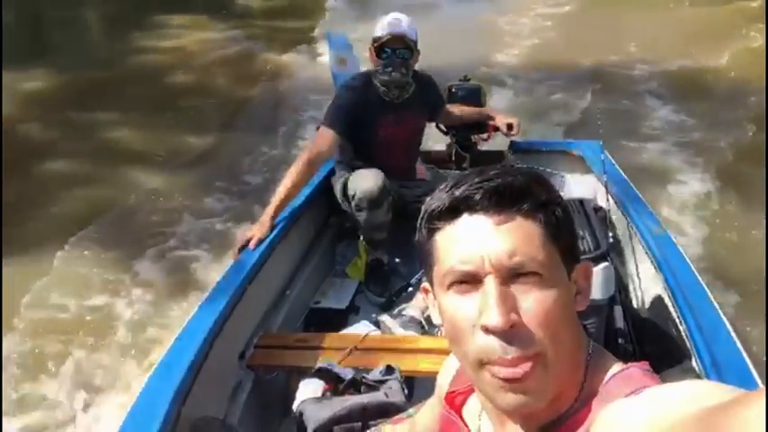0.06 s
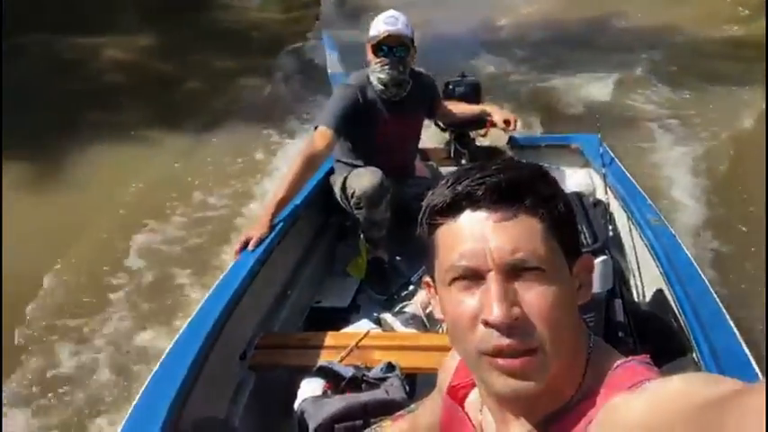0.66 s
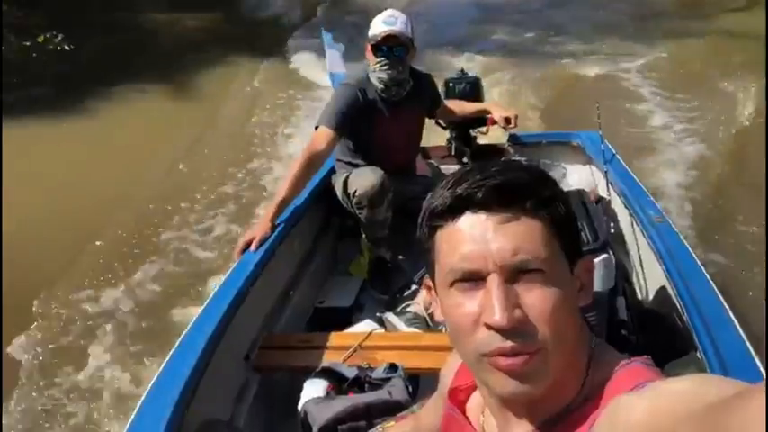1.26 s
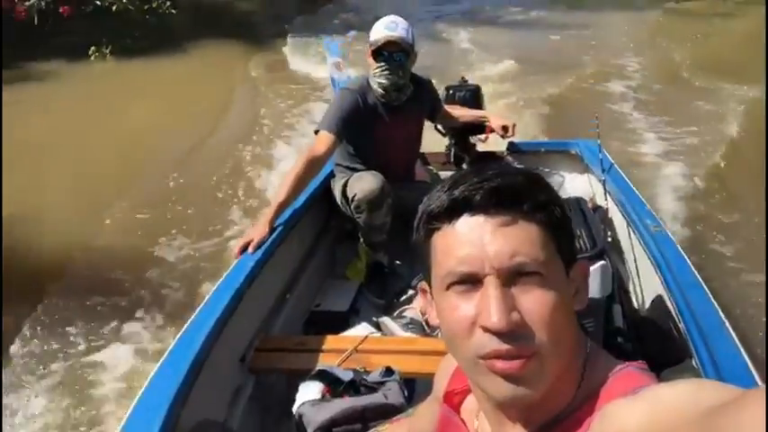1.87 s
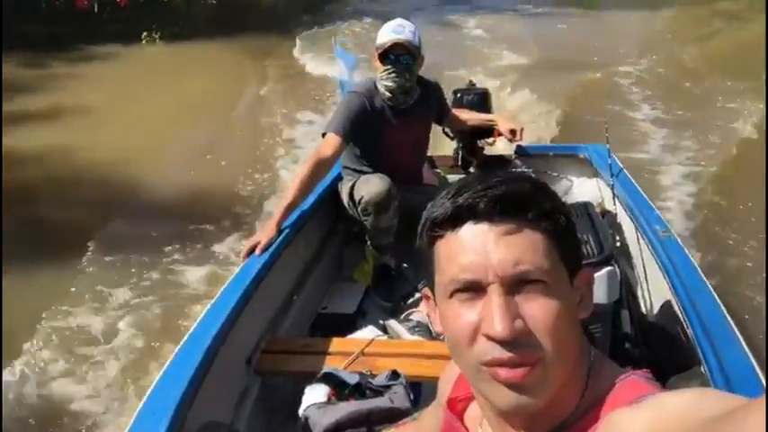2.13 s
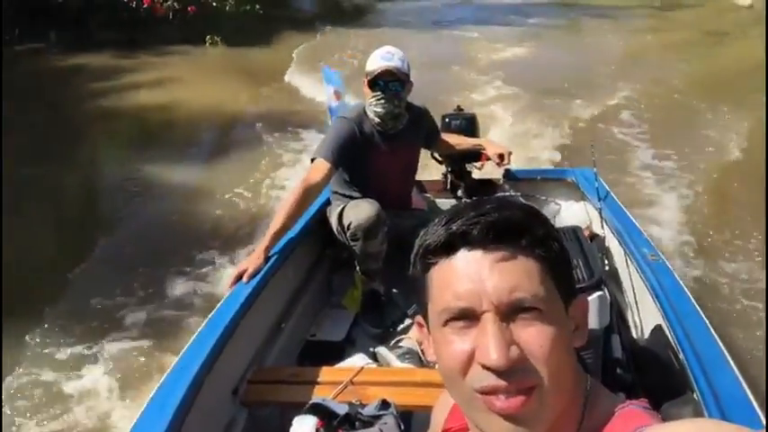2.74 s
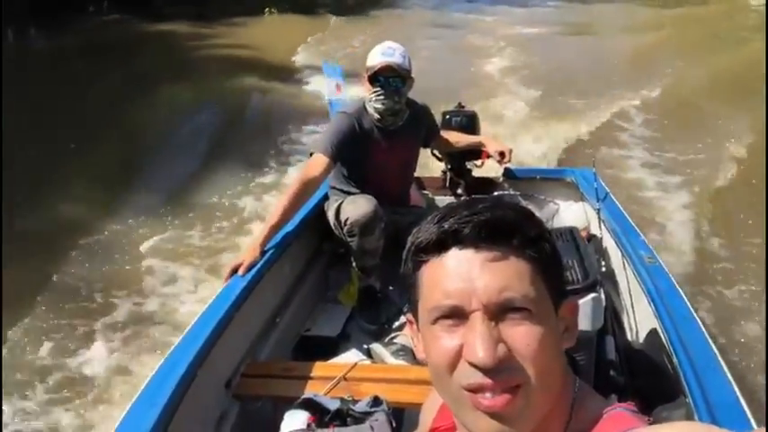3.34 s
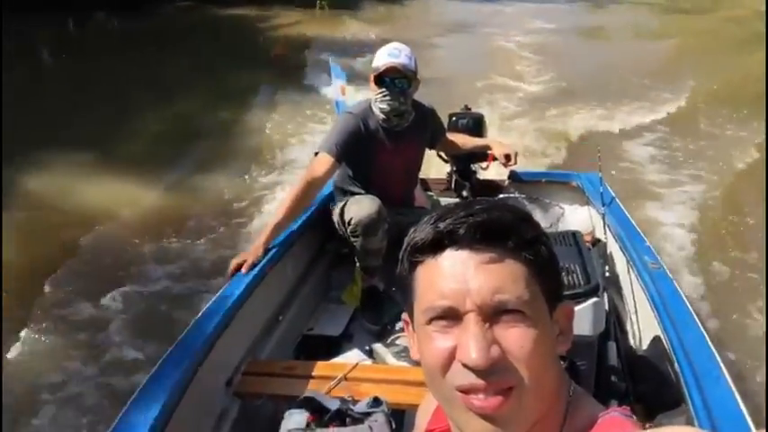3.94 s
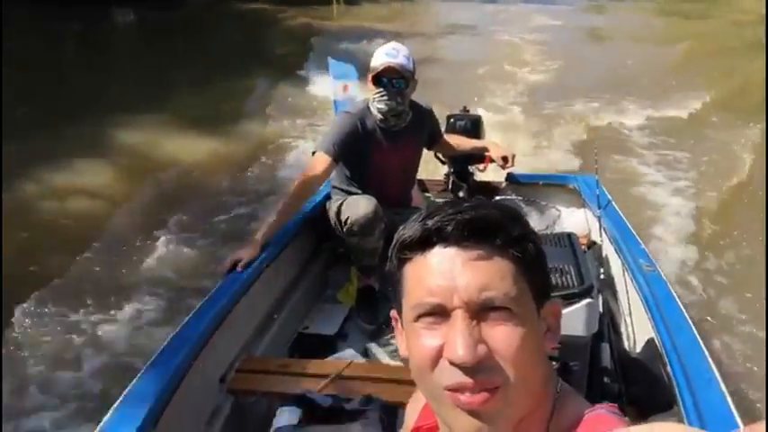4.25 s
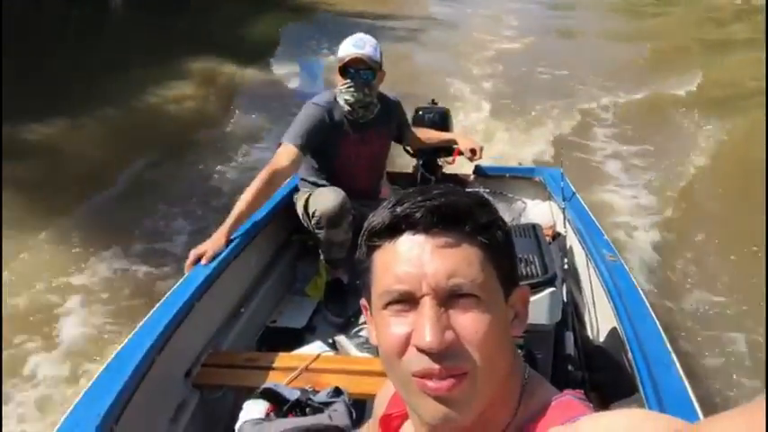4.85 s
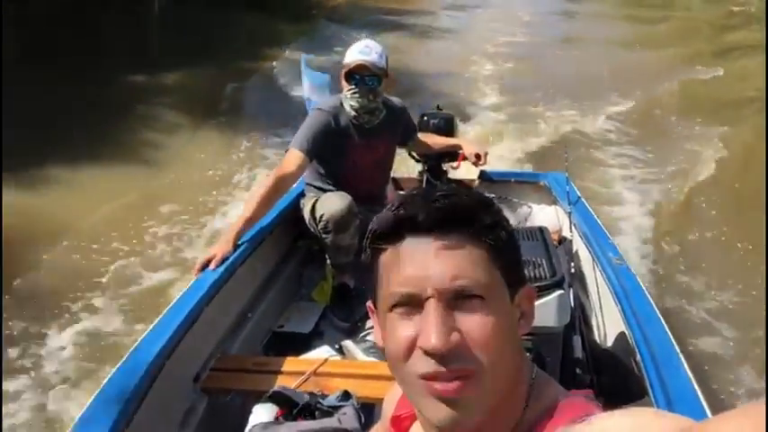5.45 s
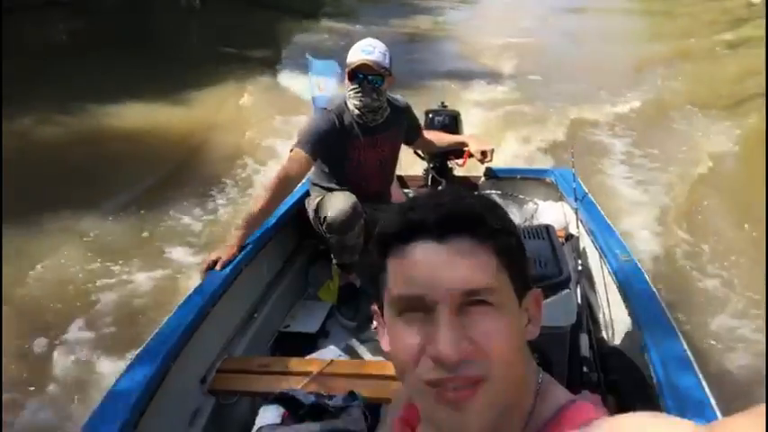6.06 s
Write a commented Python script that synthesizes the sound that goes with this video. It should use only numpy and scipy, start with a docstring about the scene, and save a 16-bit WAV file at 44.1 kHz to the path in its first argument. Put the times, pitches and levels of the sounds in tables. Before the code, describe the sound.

A small outboard motor pushes an open boat along a river at a steady cruise, heard from the bow. The exhaust drones and gurgles under water, the hull hums and the engine rattles, growing slightly louder over the first seconds. Water washes along the sides with bubbles and spray throughout. A few faint drops plink beside the hull, and later slightly larger waves splash against the bow.

```python
"""A small two-stroke outboard pushes an open boat up a river at a steady cruise, heard from the bow.
From the start each turn of the crank fires once: the exhaust drones and gurgles under water, the hull
hums, the powerhead rattles, and the bow wave washes along the sides with bubbles and spray.
Over the first seconds the motor grows slightly louder and settles. From about one second single drops
plink beside the hull, and from about two and a half larger waves splash against the bow."""
import sys
import numpy as np
from scipy import signal
from scipy.fft import rfft, irfft, next_fast_len
from scipy.io import wavfile
from scipy.ndimage import uniform_filter1d, map_coordinates

SR = 44100
rng = np.random.default_rng(int(sys.argv[2]) if len(sys.argv) > 2 else 0)


def pcm_store(signal):
    """Save signal as 16-bit PCM."""
    levels = np.round(np.clip(np.atleast_2d(signal), -1, 1) * 32767)
    wavfile.write(sys.argv[1], SR, levels.astype(np.int16).T)


N = 273494

# The throttle is held, and the crank slows a little as the motor takes more load.
# Each row: time in seconds, crank speed in turns a second.
CRANK_SPEED = [(0, 72.93), (3.6, 73.1), (4.601, 72.83), (6.2, 72.66)]


def amp(db):
    """Decibels to gain."""
    return 10 ** (np.asarray(db) / 20)


def unit(x):
    """Scale to rms 1."""
    return x / np.sqrt(np.mean(x ** 2) + 1e-20)


def along(points, hz):
    """Read a curve of (Hz, value) points on a log frequency axis."""
    point_hz, values = np.transpose(points)
    return np.interp(np.log(hz + 1), np.log(point_hz + 1), values)


def automation(points):
    """Join (seconds, value) points with straight lines, one value per sample."""
    times, values = np.transpose(points)
    return np.interp(np.arange(N) / SR, times, values)


def wobble(rate):
    """A smooth random curve with `rate` knots a second."""
    knots = rng.standard_normal(int(N * rate / SR) + 4)
    return map_coordinates(knots, [np.arange(N) * rate / SR])


def filtered(x, response):
    """Filter x with a gain given as a function of frequency."""
    size = next_fast_len(N + SR // 2)
    hz = np.fft.rfftfreq(size, 1 / SR)
    return irfft(rfft(x, size) * response(hz), size)[:N]


def coloured(x, spectrum):
    """Shape x with an EQ curve of (Hz, dB) points; rms 1."""
    return unit(filtered(x, lambda hz: amp(along(spectrum, hz))))


def patchy_noise(depth_db):
    """White noise with patches of random gain drifting over time and frequency."""
    spectra = signal.stft(rng.standard_normal(N), nperseg=512)[2]
    patches = uniform_filter1d(rng.standard_normal(spectra.shape), size=8, axis=0)
    patches = uniform_filter1d(patches, size=10, axis=1)
    return signal.istft(spectra * amp(depth_db * unit(patches)), nperseg=512)[1][:N]


def grains(pitch_hz, spread, cycles, scatter_db, rise, count, samples):
    """A cloud of damped, rising sines at random moments, some louder than the rest; rms 1."""
    when, pick, strength = rng.random((count, 3)).T[:, :, None]
    hz = pitch_hz * np.exp(spread * (2 * pick - 1))
    age = hz * np.arange(samples) / SR / cycles  # in decay times, each `cycles` periods long
    gain = amp(-scatter_db * np.log(1 - 0.97 * strength))
    envelope = (1 - np.exp(-4 * age)) * np.exp(-age)
    glide = 1 + rise * np.minimum(age, 2)
    rings = gain * envelope * np.sin(2 * np.pi * cycles * age * glide)
    positions = (when * N).astype(int) + np.arange(samples)
    return unit(np.bincount(positions.ravel(), rings.ravel(), N)[:N])


def crank(hunt_hz=0.05, tremble_hz=0.08):
    """Crank angle in turns; the speed hunts slowly, and uneven combustion makes it tremble."""
    speed_hz = automation(CRANK_SPEED) + hunt_hz * wobble(3) + tremble_hz * wobble(24)
    return np.cumsum(speed_hz) / SR


def effort_db(shortfall_db=1.9, settle_s=2.45):
    """The motor starts just under its cruising level and eases up to it as it works harder."""
    return -shortfall_db * np.exp(-np.arange(N) / SR / settle_s)


def exhaust(turns, settled_tone_db=-16.0):
    """Each firing sends a lopsided pressure wave and a puff of bubbles."""
    # The octave above the firing tone swells and sinks. Each row: time in seconds, level in dB.
    octave_levels = [(0, -36), (0.13, -20), (0.35, -25.5), (1.55, -24.5), (1.73, -28.5), (2.15, -22),
                     (2.7, -27.5), (2.81, -36), (2.96, -23), (3.9, -24), (4.14, -21), (4.33, -27),
                     (4.7, -20.5), (5.17, -28.5), (5.28, -20), (5.44, -31.5), (5.68, -23), (6.2, -22)]
    # Exhaust bubbling up behind the transom. Each row: frequency in Hz, relative level in dB.
    gurgle_eq = [(30, -28.5), (55, -5.5), (90, -7), (125, -4.5), (165, 1.5), (195, -2.5), (235, -14),
                 (330, -28.5), (700, -61)]
    angle = 2 * np.pi * turns
    tone = amp(settled_tone_db + effort_db() + 0.24 * wobble(26)) * np.cos(angle)
    octave_db = automation(octave_levels) + 0.7 * wobble(30) + 0.67 * wobble(11)
    octave = amp(octave_db) * np.cos(2 * angle + 0.1 * wobble(14))
    drone = -np.sqrt(2) * (tone + octave)
    puffs = patchy_noise(depth_db=1.0) * (1 + 0.14 * np.cos(angle))
    return drone + amp(-32.5) * coloured(puffs, gurgle_eq)


def hull(turns):
    """The shaking leg drives the hull at multiples of the crank speed; each partial flutters alone."""
    # The hum of hull and leg. Each row: crank multiple, settled rms level in dB, flutter in dB.
    partials = [(3, -35.5, 3), (4, -39, 2), (5, -37, 1.5), (6, -38, 1.6), (7, -45.5, 2), (9, -33, 0.46)]
    hum = np.zeros(N)
    for multiple, db, flutter_db in partials:
        # The ringing panels delay each partial differently, spreading a blow over the whole turn.
        lag = 0.135 * multiple ** 2
        phase = 2 * np.pi * (multiple * turns - lag) + 0.13 * flutter_db * wobble(14)
        hum += amp(db + flutter_db * wobble(14)) * np.sqrt(2) * np.cos(phase)
    return hum * amp(effort_db())


def powerhead(turns, buzz_db=-43.5, rattle_db=-31.5):
    """The piston's knock buzzes in the cowl, and rough noise surges once a turn."""
    # The cowl's ring under the knocks. Each row: frequency in Hz, relative level in dB.
    cowl_eq = [(690, -31), (800, 4.5), (880, 1.5), (1020, 1.2), (1170, 0.5), (1320, -24), (1580, -0.5),
               (1720, -13), (1900, -7), (2150, -18), (2450, -18.5), (3000, -37.5)]
    # Rough noise of powerhead and intake. Each row: frequency in Hz, relative level in dB.
    rattle_eq = [(130, -31), (250, 4.5), (310, 2), (400, -1), (500, 0.5), (680, -0.5), (800, -5),
                 (1020, -6.5), (1350, -14), (1850, -13.5), (2400, -31.5), (3400, -32.5), (6000, -43),
                 (11000, -55.5)]
    multiples = np.arange(10, 40)
    mean_crank_hz = np.mean(np.transpose(CRANK_SPEED)[1])
    gains = amp(along(cowl_eq, multiples * mean_crank_hz))
    ring = np.zeros(N)
    for multiple, gain in zip(multiples, gains):
        ring += gain * np.cos(2 * np.pi * (multiple * turns + rng.random()) + 0.65 * wobble(14))
    surge = 1 + 1.2 * np.exp(-(turns % 1) / 0.2) * amp(3.3 * wobble(70))
    rattle = amp(rattle_db) * coloured(patchy_noise(depth_db=1.0) * surge, rattle_eq)
    buzz = amp(buzz_db + 1.6 * wobble(40)) * unit(ring)
    return (buzz + rattle) * amp(1.1 * effort_db())


def waves_db(ripple_db=0.46, rise_s=0.05, fall_s=0.061):
    """The water's fader: a slowly shifting rush, small random waves, and a swell for each splash."""
    # The rush dips, builds, then creeps up. Each row: time in seconds, fader level in dB.
    rush = [(0, -54.5), (0.85, -56.3), (2.1, -53.8), (3.4, -54.5), (4.3, -53.6), (6.2, -53.5)]
    # Larger waves splash against the bow. Each row: crest time in seconds, lift over the rush in dB.
    splashes = [(2.42, 2), (2.93, 3), (3.36, 1.6), (3.94, 2), (4.25, 2.5), (5.07, 2), (5.39, 1.5),
                (5.69, 3), (5.9, 2), (6.17, 1.5)]
    t = np.arange(N) / SR
    level_db = automation(rush) + ripple_db * wobble(15)
    for crest_s, lift_db in splashes:
        width_s = np.where(t < crest_s, rise_s, fall_s)
        level_db += lift_db * np.exp(-((t - crest_s) / width_s) ** 2)
    return level_db


def bow_wave():
    """A rushing sheet of water, with bubbles in its foam, drops falling back and fine spray."""
    # Water washing along the hull. Each row: frequency in Hz, relative level in dB.
    wash_eq = [(20, 12), (50, 24), (100, 12), (300, 10), (900, 11.5), (1800, 4), (2700, -4), (3400, -2.5),
               (4200, -7), (5700, -13.5), (6700, -14.5), (7600, -19), (9200, -20.5), (11500, -35)]
    fader = amp(waves_db())
    slosh = wobble(18)  # wash, drops and spray flicker together
    wash = amp(13.5 + 0.32 * slosh) * coloured(patchy_noise(depth_db=1.6), wash_eq)
    bubbles = amp(1.5) * grains(
        pitch_hz=1094, spread=0.8, cycles=7, scatter_db=-1.0, rise=0.04, count=900, samples=1500)
    drops = amp(-10.5 + slosh) * grains(
        pitch_hz=3580, spread=0.55, cycles=11, scatter_db=3.5, rise=0.02, count=2600, samples=800)
    spray = amp(-20 + slosh) * grains(
        pitch_hz=7500, spread=0.31, cycles=2.5, scatter_db=3.5, rise=0.02, count=3000, samples=150)
    return fader * (wash + bubbles + drops + spray)


def plinks(attack_s=0.00097, ring_s=0.003, rise=4, splat_mix=0.27, splat_s=0.0036):
    """A drop splats on the surface and traps a small bubble, which rings briefly and rises in pitch."""
    # Single drops beside the hull. Each row: start in seconds, pitch in Hz, gain in dB.
    drops = [(.961, 5050, -44), (2.130, 2120, -31), (3.554, 4650, -41.5), (4.387, 2910, -35),
             (5.052, 3250, -38.5), (5.454, 3340, -38), (5.640, 5400, -50)]
    track = np.zeros(N)
    t = np.arange(SR // 20) / SR
    for start_s, hz, db in drops:
        envelope = (1 - np.exp(-t / attack_s)) * np.exp(-t / ring_s)
        ring = envelope * np.sin(2 * np.pi * hz * t * (1 + rise * t))
        octave_band = signal.butter(2, [hz / np.sqrt(2), hz * np.sqrt(2)], "bandpass", fs=SR, output="sos")
        splat = unit(signal.sosfilt(octave_band, rng.standard_normal(len(t)))) * np.exp(-t / splat_s)
        track[round(start_s * SR):][:len(t)] += amp(db) * (ring + splat_mix * splat)
    return track


def scene():
    """Motor and water in the open air, in mono; one crank drives all the motor's layers."""
    turns = crank()
    motor = exhaust(turns) + hull(turns) + powerhead(turns)
    return (motor + bow_wave() + plinks())[None]


def record(dry):
    """A brick-wall high cut takes off the top of the treble."""
    return filtered(dry[0], lambda hz: hz < 11600)[None]


dry = scene()
out = record(dry)
pcm_store(out)
```